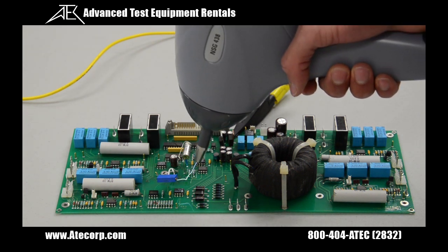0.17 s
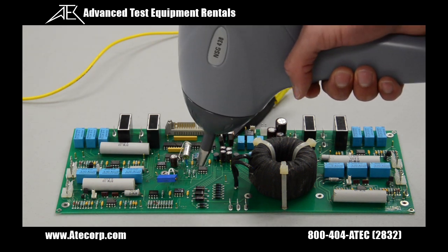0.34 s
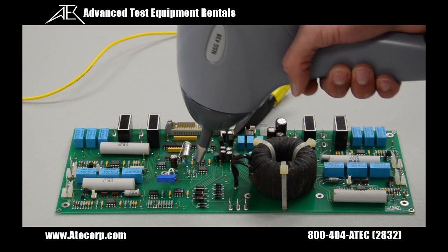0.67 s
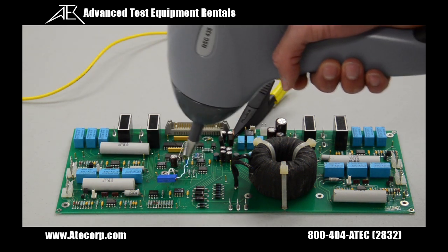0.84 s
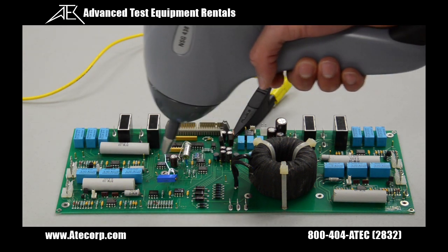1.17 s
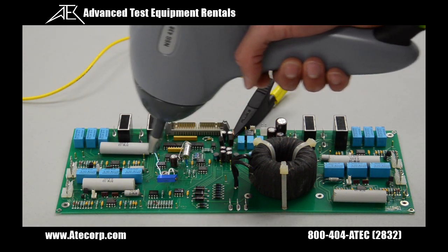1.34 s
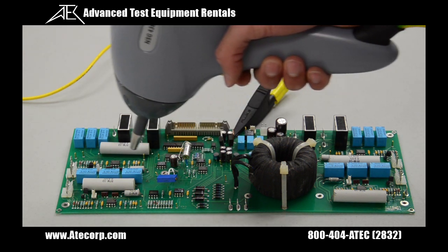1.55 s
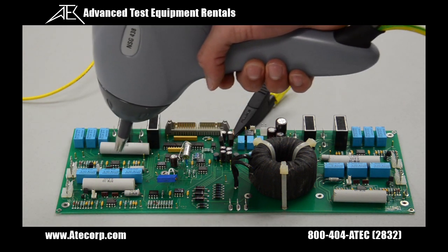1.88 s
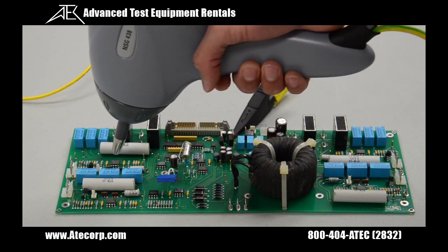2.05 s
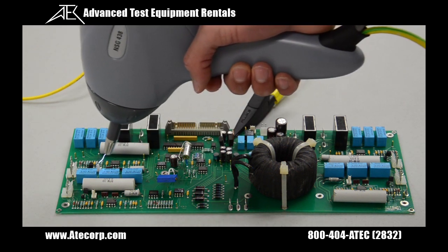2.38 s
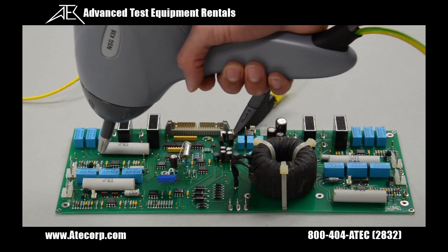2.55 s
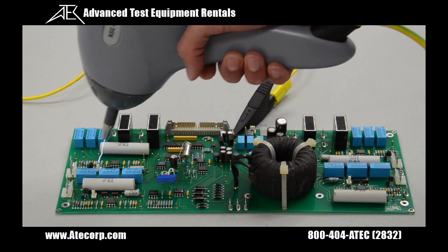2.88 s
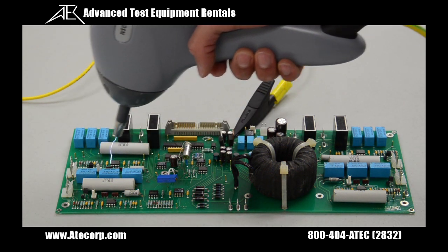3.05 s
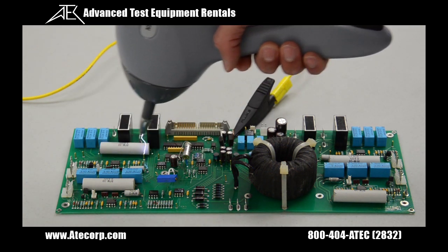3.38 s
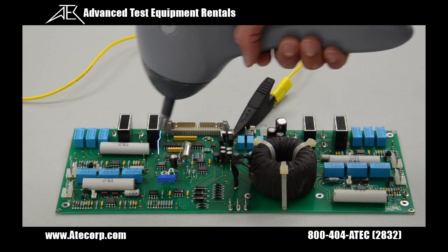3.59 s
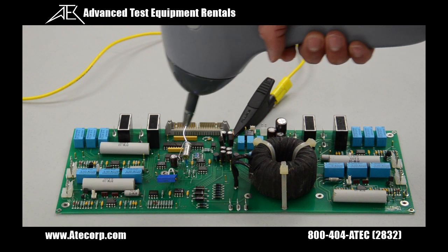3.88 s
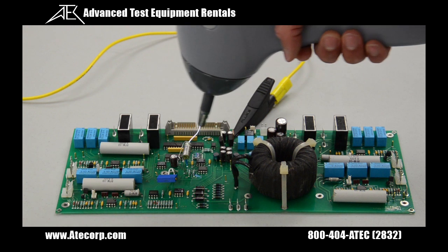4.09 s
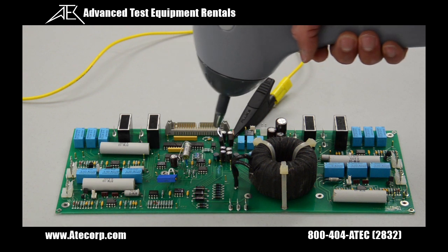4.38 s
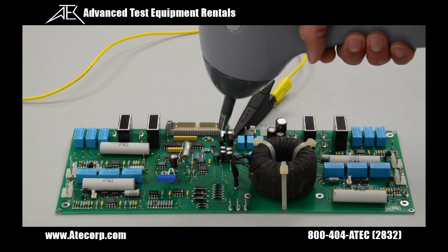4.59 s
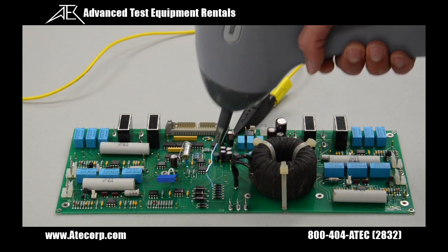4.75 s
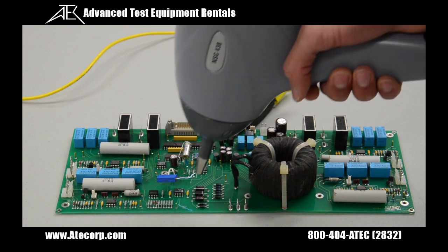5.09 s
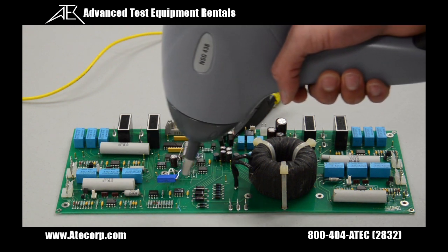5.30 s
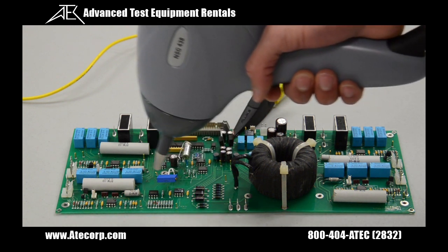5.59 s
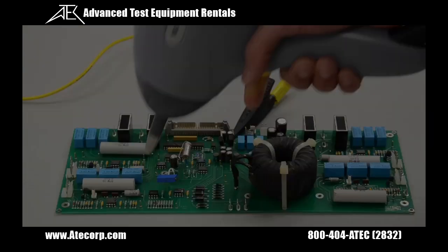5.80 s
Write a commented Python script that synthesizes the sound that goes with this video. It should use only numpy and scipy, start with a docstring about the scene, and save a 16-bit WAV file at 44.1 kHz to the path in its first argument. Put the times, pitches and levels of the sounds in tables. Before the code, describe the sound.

A static discharge gun fires bright snapping sparks at a circuit board, up to twenty a second, with gaps, soft hiss and small-room ring.

```python
"""A small lab: a handheld static discharge gun fires bursts of sparks, twenty a second, onto a circuit board.
Each spark is a pressure snap that rings the air between the parts where it strikes; a dull first echo, wall
echoes and a diffuse room tail follow. The charged tip hisses, sputters and briefly sizzles over a gap.
Electrical pops in the microphone lead, a low thump as the trigger is released and small dry ticks from the gun
stand out over a ventilation hum. One microphone takes it all, on the right channel only."""
import sys
import numpy as np
from scipy import signal
from scipy.fft import rfft, irfft, next_fast_len
from scipy.io import wavfile
from scipy.ndimage import map_coordinates

SR = 44100
rng = np.random.default_rng(int(sys.argv[2]) if len(sys.argv) > 2 else 0)


def unload_wav(signal):
    """Save mono or channel-first audio to the path in sys.argv[1] as 16-bit WAV at rate SR, clipped to [-1, 1]."""
    wavfile.write(
        sys.argv[1],
        SR,
        np.round(np.clip(np.atleast_2d(signal).T, -1, 1) * 32767).astype(np.int16),
    )


N = 261513
SIZE = 2 ** 15  # transform length of one spark with its echoes and tail
HZ = np.fft.rfftfreq(SIZE, 1 / SR)

# colour of the diffuse sound in the lab: (f/Hz, level/dB)
ROOM_COLOUR = [(100, -22.5), (280, -5), (420, -3), (650, 0), (850, -4), (1150, -2.5), (1700, -2.5),
               (2800, 0.5), (5000, -0.5), (7500, -3.5), (10000, -9), (13000, -8), (16000, -25)]


def amp(db):
    """Decibels to gain."""
    return 10 ** (np.asarray(db) / 20)


def unit(x):
    """Scale to rms 1."""
    return x / np.sqrt(np.mean(np.abs(x) ** 2) + 1e-20)


def along(points, hz):
    """(f/Hz, value) points read on a log frequency axis."""
    f, value = np.transpose(points)
    return np.interp(np.log(hz + 1), np.log(f + 1), value)


def wobble(rate):
    """A smooth random curve, rate knots a second."""
    knots = rng.standard_normal(int(N * rate / SR) + 4)
    return map_coordinates(knots, [np.arange(N) * rate / SR])


def filtered(x, response):
    """x passed through a complex response of frequency."""
    size = next_fast_len(len(x) + SR // 4)
    spectrum = rfft(x, size) * response(np.fft.rfftfreq(size, 1 / SR))
    return irfft(spectrum, size)[:len(x)]


def low_cut(hz, corner_hz):
    """First-order loss of bass below the corner."""
    return 1j * hz / (corner_hz + 1j * hz)


def noise(spectrum):
    """Coloured noise of rms 1."""
    return unit(filtered(rng.standard_normal(N), lambda hz: amp(along(spectrum, hz))))


def resonance(hz, centre, width):
    """Response of one damped mode, 1 at its centre."""
    return 1j * hz * width / (centre ** 2 - hz ** 2 + 1j * hz * width)


def causal(db):
    """The most compact causal response with these levels on the HZ grid."""
    cepstrum = irfft(np.log(amp(db)))
    cepstrum[1:SIZE // 2] *= 2
    cepstrum[SIZE // 2 + 1:] = 0
    return np.exp(rfft(cepstrum))


def delay(ms):
    """Response of a travel time."""
    return np.exp(-2j * np.pi * HZ * ms / 1000)


def add(track, s, sound):
    """Mix a sound into a track at time s, losing what falls outside."""
    start = round(s * SR)
    sound = sound[max(-start, 0):]
    part = track[max(start, 0):][:len(sound)]
    part += sound[:len(part)]


def ventilation(air_db=-57.0, waver_db=1.0, drift_rad=0.93):
    """Low air noise with a few fan tones, unsteady in level and phase."""
    # air noise: (f/Hz, level/dB)
    air_colour = [(25, -27), (60, -22), (95, -20), (155, -4.5), (200, -12.5), (280, -2), (350, -9),
                  (440, -5), (550, -12.5), (660, -8.5), (800, -15.5), (2000, -20.5), (4000, -60)]
    # fan tones: (f/Hz, rms level/dB)
    fan_tones = [(296.1, -65.5), (473.7, -77), (640.6, -72.5), (802.1, -84)]
    t = np.arange(N) / SR
    tones = np.zeros(N)
    for hz, db in fan_tones:
        level = amp(db + waver_db * wobble(4.27))
        tones += level * np.sin(2 * np.pi * hz * t + drift_rad * wobble(6.9))
    return amp(air_db) * noise(air_colour) + np.sqrt(2) * tones


def corona(full_db=-53, sputter_rate=170, fizz_hz=4000):
    """Charge leaks from the tip as a hiss that sputters when weak, and at the end dulls and dies."""
    # hiss per hertz: (f/Hz, level/dB)
    hiss_colour = [(300, -21), (800, -6.5), (1600, -6), (3000, -7.5), (5000, -8), (9000, -14.5),
                   (13000, -22.5), (16000, -31)]
    lift_s, lift_width_s, lift_db = 1.796, .21, 13  # the tip is lifted away: when, for how long, loss of hiss
    sputter_grows, sputter_max_db = 0.53, 5  # dB of sputter per dB of hiss lost, and its limit
    # around the last spark the charge begins to drain away, the treble faster
    stop_s, drain_db_per_s, dull_db_per_s = 5.475, 33, 32
    t = np.arange(N) / SR
    idle_s = np.maximum(t - stop_s, 0)
    lifted_db = lift_db * np.exp(-np.abs(t - lift_s) / lift_width_s)
    lost_db = lifted_db + drain_db_per_s * idle_s
    depth_db = np.minimum(sputter_grows * lost_db, sputter_max_db)
    hiss = noise(hiss_colour)
    body = filtered(hiss, lambda hz: 1 / (1 + (hz / fizz_hz) ** 4))
    fizz = hiss - body
    colour = body + amp(-dull_db_per_s * idle_s) * fizz
    sputter_db = depth_db * np.clip(wobble(sputter_rate), -2, 2)
    return amp(full_db - lost_db + sputter_db) * colour


def discharges(firing_s=.05, jitter_s=.0004, uneven_db=.5, tone_db=2.03):
    """Every spark as (t/s, crack/dB, brightness/dB): steady recharging, each breakdown a little different."""
    # bursts on the gun's firing clock: (start t/s, number of sparks, crack level/dB, brightness/dB)
    bursts = [(-.0366, 3, -19.5, -0.5), (0.1354, 1, -20, -1), (0.2133, 1, -17, -5), (.287, 1, -19.5, -9.5),
              (0.403, 1, -21.5, -10.5), (.5514, 1, -22, -10), (0.7879, 1, -20.5, -6), (.866, 4, -20, -2),
              (1.0684, 2, -19, -3.5), (1.165, 2, -21, -4.5), (1.269, 3, -20.5, -2.5),
              (2.2565, 1, -21.5, -0.5), (2.3396, 1, -22, 0.5), (2.3808, 2, -21, 0), (2.4734, 3, -22, -1),
              (2.6228, 5, -23.5, 1), (2.8788, 1, -21, 4), (2.9238, 1, -22.5, 1), (2.9802, 3, -18.5, -5.5),
              (3.1314, 3, -16.5, -0.5), (3.2848, 2, -17.5, -2.5), (3.3823, 2, -17.5, -2),
              (3.4773, 1, -17.5, -3), (3.53, 2, -19, -4.5), (3.624, 1, -20, -4), (3.6804, 3, -16.5, 0.5),
              (3.8259, 2, -18.5, 0), (3.9266, 2, -19.5, -2.5), (4.03, 1, -18, 1.5), (4.0764, 3, -19.5, 1),
              (4.2225, 2, -19, -1), (4.3166, 1, -21.5, -1.5), (4.3849, 2, -22.5, -1.5),
              (4.3993, 1, -23.5, -2), (4.5016, 1, -21, 3), (4.5172, 1, -21.5, 0.5), (4.558, 1, -21.5, -0.5),
              (4.6253, 1, -21, -0.5), (4.672, 1, -21, -1), (4.746, 1, -21.5, -5.5), (4.7935, 1, -19, -8.5),
              (4.8415, 1, -19, -1.5), (4.899, 2, -23, -4.5), (5.0062, 1, -20.5, -1.5), (5.0497, 1, -21, -5),
              (5.0942, 3, -20.4, 2), (5.2526, 1, -20, 0.5), (5.302, 1, -19.5, -7.5),
              (5.351, 3, -20.5, -0.1), (5.5044, 1, -21, -1)]
    rows = []
    for s, count, db, bright_db in bursts:
        for k in range(round(count)):
            rows.append((s + k * firing_s, db, bright_db))
    rows = np.array(rows)
    return rows + rng.standard_normal(rows.shape) * [jitter_s, uneven_db, tone_db]


def bend(centre_hz, width_hz):
    """Bending round an obstacle spreads a snap over a few cycles and keeps its colour."""
    return 1 - 2 * resonance(HZ, centre_hz, width_hz)


def scatter(db=-4, t60=0.0077, build_s=0.00053, above_hz=8500):
    """Small parts on the board throw back the shortest waves in a brief random spray."""
    t = np.arange(SR // 100) / SR
    envelope = amp(-60 * t / t60) * (1 - np.exp(-t / build_s))
    spray = unit(rfft(rng.standard_normal(len(t)) * envelope, SIZE))
    return 1 + amp(db) * spray / (1 + (above_hz / (HZ + 1)) ** 6)


def cracks(spot, snap_hz=9500, air_hz=13500, wander=0.024, uneven_db=2.0):
    """A snap rings the cavities of one spot; every arc takes a slightly different path."""
    # air resonances between the parts around each spot: (spot number, f/Hz, width/Hz, level/dB)
    cavities = [(0, 750, 1400, -10.5), (0, 1620, 340, -7.5), (0, 2830, 640, -8.5), (0, 5700, 460, -19),
                (0, 4600, 180, -7.5), (0, 6350, 540, -1.5), (0, 7400, 680, -3.5), (0, 6800, 290, -11),
                (1, 680, 740, -11), (1, 1640, 520, -4), (1, 3020, 630, -2), (1, 4050, 75, -3.5),
                (1, 4490, 160, -2), (1, 5600, 1300, 0.5), (1, 7200, 320, 1), (1, 8120, 440, 5),
                (2, 720, 1700, -10.5), (2, 1630, 350, -5.5), (2, 3010, 370, -7.5), (2, 3920, 83, -7.5),
                (2, 4660, 180, -3), (2, 6440, 950, 1.5), (2, 7230, 1000, -2.5), (2, 17000, 4400, -13.5),
                (3, 640, 460, -5), (3, 1620, 430, -2), (3, 2880, 150, -3.5), (3, 3060, 1700, -7.5),
                (3, 4900, 100, -3.5), (3, 6030, 740, -3.5), (3, 7400, 450, 1), (3, 8700, 670, -6.5),
                (4, 670, 480, -9.5), (4, 1830, 800, -6.5), (4, 3120, 410, -1.5), (4, 3970, 180, -8.5),
                (4, 4660, 840, 1), (4, 5860, 170, 1.5), (4, 7200, 320, -0.5), (4, 13500, 4900, -20),
                (5, 610, 710, -11), (5, 1740, 230, -5), (5, 2630, 790, -8), (5, 3600, 130, -5.5),
                (5, 4720, 220, 1.5), (5, 6620, 1100, -6), (5, 7430, 1100, 3), (5, 13800, 3300, -8),
                (6, 960, 1900, -10), (6, 1820, 650, -10), (6, 2710, 410, -0.5), (6, 3130, 200, -5),
                (6, 4250, 670, -9), (6, 5700, 230, 2.5), (6, 7020, 1560, 2.5), (6, 8400, 660, -7),
                (7, 600, 500, -15), (7, 1500, 880, -9), (7, 2730, 830, -3), (7, 3690, 160, -0.5),
                (7, 4370, 330, -2), (7, 5300, 170, -1), (7, 6800, 1100, -5.5), (8, 510, 450, -8),
                (8, 1410, 970, -2), (8, 2560, 640, 2.5), (8, 4080, 200, -2.5), (8, 5120, 460, 3),
                (8, 6300, 780, -2.5), (8, 6860, 510, 1), (8, 7430, 760, 3.5)]
    ring = np.zeros(len(HZ), complex)
    for number, hz, width, db in cavities:
        if round(number) == spot:
            level = amp(db + uneven_db * rng.normal())
            ring += level * resonance(HZ, hz * (1 + wander * rng.normal()), width)
    snap = 1 / (1 + np.sqrt(2) * 1j * HZ / snap_hz - (HZ / snap_hz) ** 2)
    air = 1 / np.sqrt(1 + (HZ / air_hz) ** 10)
    path = bend(centre_hz=4840, width_hz=6000) * bend(centre_hz=10700, width_hz=11300)
    return unit(ring * snap * air * path * scatter())


def room_tails(count, alike_hz=7000, build_s=0.0037):
    """One diffuse tail per spark: the low end repeats, the treble changes as the hand moves."""
    # reverberation of the lab: (f/Hz, t60/s)
    decay_times = [(200, 0.48), (1500, 0.43), (5000, 0.55), (9000, 0.37), (15000, 0.25)]
    grains = rng.standard_normal((count + 1, SR // 2)).astype('f')
    hz, t, z = signal.stft(grains, SR, nperseg=256)
    alike = np.exp(-hz / alike_hz)[:, None]
    mixed = alike * z[0] + np.sqrt(1 - alike ** 2) * z[1:]
    fade = amp(-60 * t / along(decay_times, hz)[:, None]) * (1 - np.exp(-t / build_s))
    tails = signal.istft(mixed * fade, SR, nperseg=256)[1]
    return rfft(tails, SIZE)


def sparks(fired, crack_db=1, imprint=0.11, shade=0.16):
    """Each discharge: the direct crack, a dull first echo, wall echoes and the room's tail."""
    # where the arc lands: (from t/s, delay of the first echo/ms)
    landing_spots = [(0, 5.0), (.18, 5.05), (.7, 4.98), (2.1, 4.87), (2.955, 4.74), (3.655, 4.85),
                     (4.15, 4.76), (4.77, 4.95), (4.98, 5.05)]
    # share of the crack sent into the room, one value per landing spot: (level/dB)
    sent_db = [-8, -8.5, -8.5, -6.5, -10, -11.5, -9.5, -8, -8]
    # later echoes from bench, equipment and walls: (delay/ms, level/dB)
    wall_echoes = [(7.5, -9), (13.4, -30), (15.0, -14.5), (17.9, -11.5), (20.1, -10), (33.9, -13.5),
                   (41.1, -28.5), (42.0, -25)]
    # colour of the first echo: (f/Hz, level/dB)
    echo_colour = [(200, -26.5), (900, -7.5), (1500, -4.5), (3200, -1), (4900, -3.5), (5700, -7.5),
                   (7500, -23.5), (10500, -12.5), (16000, -27)]
    track = np.zeros(N)
    starts, echo_ms = np.transpose(landing_spots)
    dull = unit(causal(along(echo_colour, HZ)))
    room = unit(causal(along(ROOM_COLOUR, HZ)))
    spread = bend(centre_hz=3120, width_hz=2040) * bend(centre_hz=8200, width_hz=1000)
    treble = along([(3500, -.5), (8000, .5)], HZ)  # tilt for 1 dB of brightness
    # the wall paths shift a little from spot to spot
    paths = [sum(amp(db) * delay(ms + 0.11 * rng.normal()) for ms, db in wall_echoes)
             for _ in landing_spots]
    for (s, db, bright_db), tail in zip(fired, room_tails(len(fired))):
        spot = max(np.searchsorted(starts, s) - 1, 0)
        crack = unit(cracks(spot) * amp(bright_db * treble))
        # the room hears all directions, so it keeps only a trace of the crack's colour
        far = unit(room * np.abs(crack) ** imprint) * (paths[spot] + unit(tail))
        answer = spread * (dull * delay(echo_ms[spot]) + far)
        # parts that hide the arc, and so dull it, do not hide it from the room
        sent = amp(sent_db[spot] - shade * bright_db)
        heard = amp(db) * (amp(crack_db) * crack + sent * answer)
        # levels are energies spread over one millisecond; a 1 ms lead keeps the very onset
        add(track, s - .001, np.sqrt(SR / 1000) * irfft(heard * delay(1)))
    return track


def sizzle(ring_hz=7950, width_hz=900, flutter_db=3):
    """While the sparks are sparse, the leaking charge rings the narrow gap under the tip."""
    # rise and fall of the sizzle: (t/s, level/dB)
    sizzle_levels = [(.3, -85), (.46, -60), (.6, -61), (.77, -64), (.85, -85)]
    s, db = np.transpose(sizzle_levels)
    ring = unit(filtered(rng.standard_normal(N), lambda hz: resonance(hz, ring_hz, width_hz) ** 2))
    level_db = np.interp(np.arange(N) / SR, s, db)
    return amp(level_db + flutter_db * wobble(60)) * ring


def ticks():
    """Short dry ticks from the gun: bursts of room-coloured noise that die at once."""
    # ticks: (t/s, level/dB, t60/s)
    gun_ticks = [(0.477, -41, .025), (1.46, -41, 0.023), (2.208, -43.5, 0.059), (5.734, -41, 0.029),
                 (5.754, -48.5, 0.036)]
    level, t = np.zeros(N), np.arange(SR // 10) / SR
    for s, db, t60 in gun_ticks:
        add(level, s, amp(db - 60 * t / t60))
    return level * noise(ROOM_COLOUR)


def pops(swing_hz=260, t60=0.0057, db=11.5, low_cut_hz=130, lag_s=.0012):
    """Low pops, each one low swing with a steep edge: most are discharge current picked up in the microphone
    lead, the last a thump as the trigger is released."""
    # low pops: (t/s before the lag, relative level/dB); the last is the trigger being released
    low_pops = [(0.962, -32.5), (1.114, -45), (1.263, -46), (1.367, -37.5), (2.377, -32), (2.618, -31.5),
                (2.667, -44), (2.72, -28.5), (2.977, -36.5), (3.331, -36.5), (3.527, -44), (3.924, -45),
                (3.973, -37.5), (4.026, -29.5), (4.397, -39.5), (4.741, -47), (5.14, -33.5),
                (5.757, -39.5)]
    edge, edge_hz, edge_t60 = 0.97, 620, 0.0019  # level relative to the swing, Hz, s
    track, t = np.zeros(N), np.arange(SR // 20) / SR
    swing = np.sin(2 * np.pi * swing_hz * t) * amp(-60 * t / t60)
    swing += edge * np.sin(2 * np.pi * edge_hz * t) * amp(-60 * t / edge_t60)
    for s, pop_db in low_pops:
        add(track, s + lag_s, amp(pop_db + db) * swing)
    return filtered(track, lambda hz: low_cut(hz, low_cut_hz))


def scene(low_cut_hz=250):
    """One microphone, plugged into the right channel only; so small an arc radiates little bass."""
    arcs = filtered(sparks(discharges()), lambda hz: low_cut(hz, low_cut_hz))
    mono = ventilation() + corona() + arcs + sizzle() + ticks() + pops()
    return np.array([np.zeros(N), 2 * mono])  # the gain of 2 lifts every layer alike


def record(dry, top=0.75, top_hz=16800):
    """The microphone's narrow dips, an input stage that rounds the tallest peaks, then the band limit."""
    # microphone dips: (f/Hz, width/Hz, depth 0-1, held to .88 below)
    mic_dips = [(5696, 660, 1), (6940, 180, 0.96), (15050, 500, 0.9)]

    def dips(hz):
        response = 1
        for centre, width, depth in mic_dips:
            response = response * (1 - min(depth, .88) * resonance(hz, centre, width))
        return response

    def band(hz):
        return np.clip((top_hz - hz) / 400, 0, 1)

    picked = np.array([filtered(channel, dips) for channel in dry])
    rounded = picked / (1 + (picked / top) ** 4) ** (1 / 4)
    return np.array([filtered(channel, band) for channel in rounded])


dry = scene()
out = record(dry)
unload_wav(out)
```